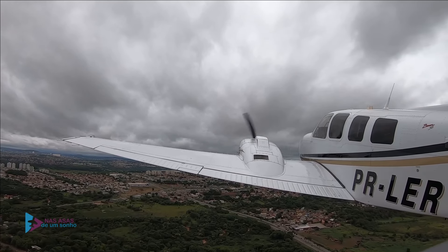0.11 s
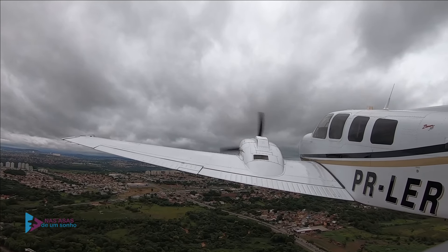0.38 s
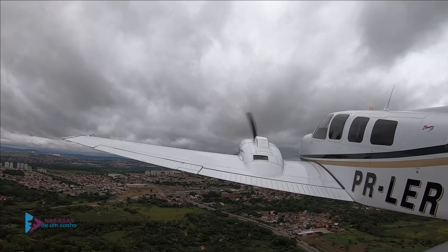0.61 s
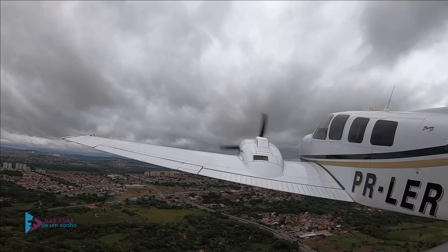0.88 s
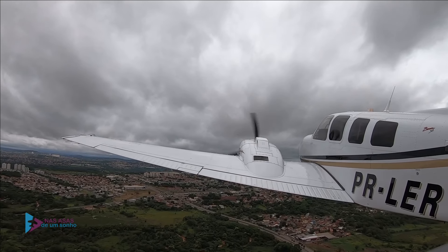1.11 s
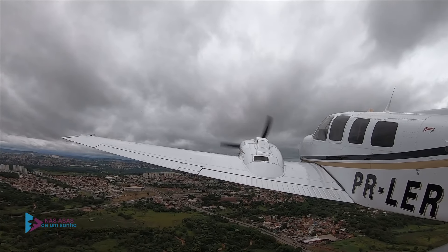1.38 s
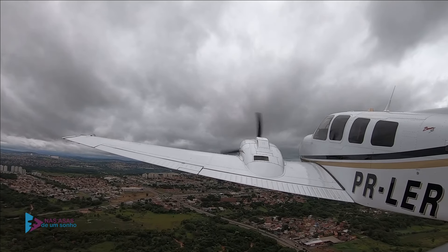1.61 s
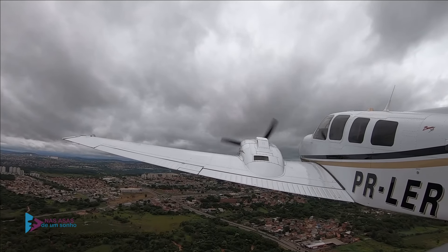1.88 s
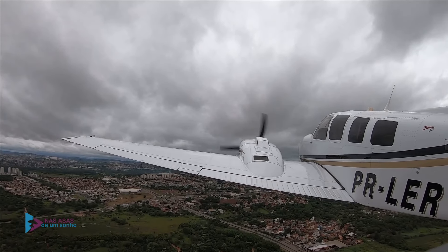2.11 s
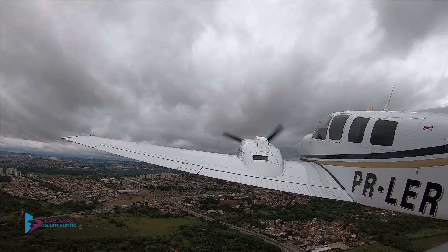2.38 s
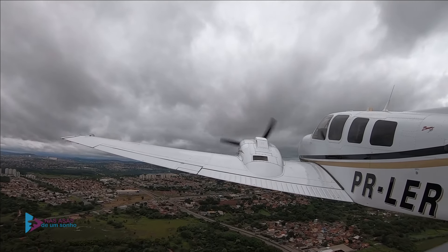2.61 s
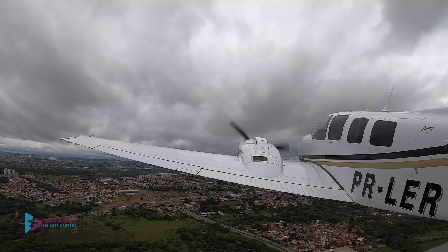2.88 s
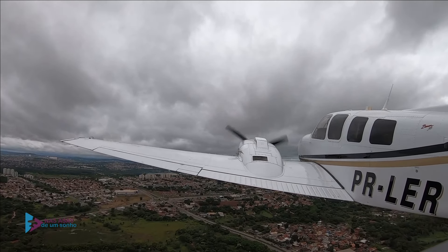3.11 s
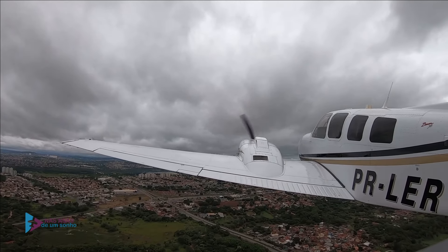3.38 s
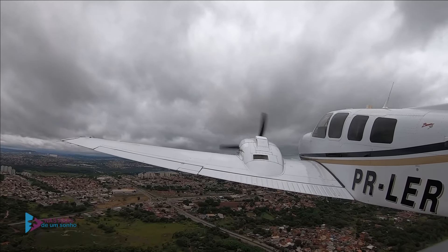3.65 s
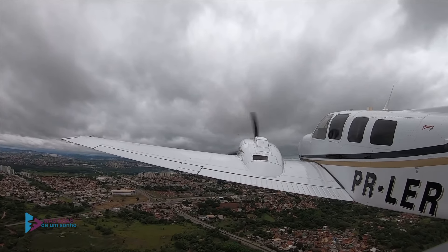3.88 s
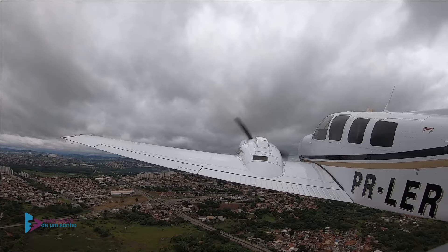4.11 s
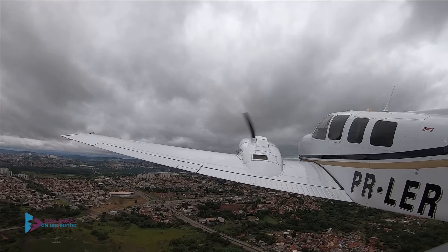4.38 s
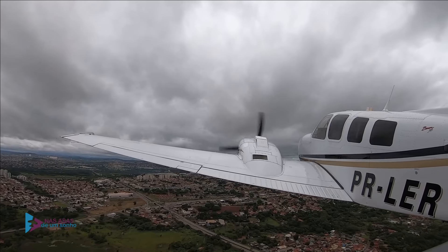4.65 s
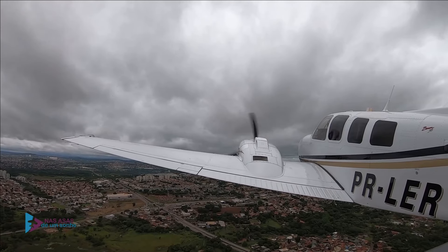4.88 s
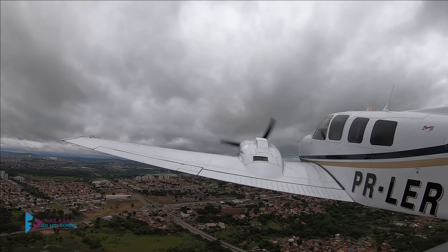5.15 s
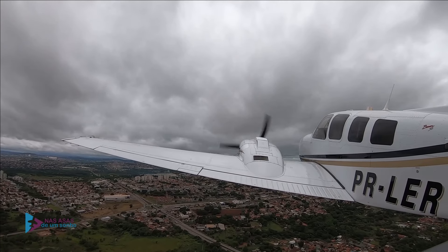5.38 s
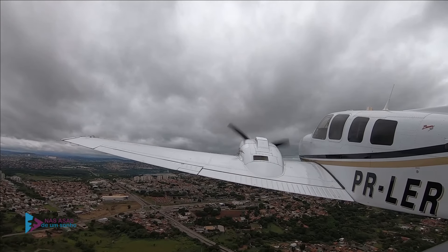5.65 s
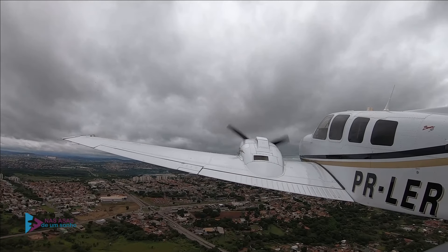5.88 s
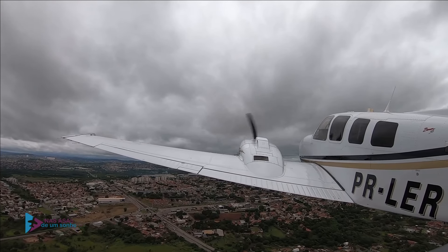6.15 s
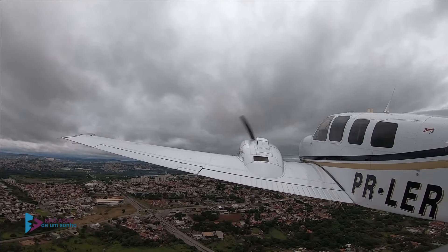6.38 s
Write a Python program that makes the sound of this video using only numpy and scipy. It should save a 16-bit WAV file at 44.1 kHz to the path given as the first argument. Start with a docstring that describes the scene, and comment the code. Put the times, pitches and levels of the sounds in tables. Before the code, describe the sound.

Two piston propeller engines of a light aircraft drone loudly and steadily, beating slowly against each other over rushing slipstream, heard in the right channel.

```python
"""Inside a light twin-engined aircraft in the climb, with one microphone wired to the right channel.
From the start two six-cylinder engines with three-blade propellers, each a stack of sine tones, run almost in step
and beat slowly over shaped-noise slipstream roar, microphone hiss and thin alternator whines. Extra treble hiss stops
after 0.15 s. The second engine slips back, holds, then partly catches up; upper tones thin out as the speed sags.
Throughout, the left channel holds only a dull leak of the right, with amplifier hiss and a faint electrical buzz."""
import sys
import numpy as np
from scipy import signal
from scipy.fft import rfft, irfft, next_fast_len
from scipy.io import wavfile
from scipy.ndimage import uniform_filter1d

SR = 44100
rng = np.random.default_rng(int(sys.argv[2]) if len(sys.argv) > 2 else 0)


def linear_from_db(decibels):
    """Turn decibels (scalar or array-like) into linear amplitude factors; 0 gives 1."""
    return 10 ** (np.asarray(decibels, float) / 20)


def generate_wav(signal):
    """Clip the signal to [-1, 1] and save it as 16-bit WAV at the path in sys.argv[1]."""
    frames = np.transpose(np.atleast_2d(signal))
    scaled = np.clip(frames, -1, 1) * 32767
    pcm = np.round(scaled).astype(np.int16)
    wavfile.write(sys.argv[1], SR, pcm)


N = 287106

# All levels below are ahead of the input gain and the limiter.
# The first engine's speed hunts slowly: (t/s, shaft speed/rpm)
FIRST_SPEED = [(0.0, 2637.7), (0.6, 2642.6), (1.2, 2655.0), (1.6, 2652), (2.1, 2650.5), (2.55, 2640.5),
               (3.3, 2650.5), (3.9, 2654.0), (4.3, 2652), (5.0, 2636.5), (5.5, 2632), (6.1, 2618),
               (6.51, 2619.0)]
# The second engine slips back, holds, then partly catches up: (t/s, lag behind the first/blade passes)
SECOND_LAG = [(0.0, 1.867), (0.65, 1.85), (1.3, 2.035), (2.0, 2.23), (2.52, 2.435), (2.75, 2.54),
              (3.65, 2.84), (4.2, 2.925), (4.55, 2.92), (5.0, 2.825), (5.65, 2.815), (6.05, 2.66),
              (6.35, 2.61), (6.51, 2.56)]
# Engine tones at multiples of half the shaft speed, 6 = firing and blade rate:
# (multiple, first engine rms level/dB, second engine rms level/dB)
ENGINE_TONES = [(1, -28, -29), (2, -28, -33), (3, -50, -25), (4, -30, -27), (5, -50, -44), (6, -12, -15),
                (7, -51, -46), (8, -43, -50), (9, -52, -46), (10, -43, -38), (11, -44, -38), (12, -19, -25),
                (13, -56, -48), (14, -44, -38), (15, -55, -40), (16, -49, -53), (17, -63, -46),
                (18, -38, -33.5), (19, -64, -45), (20, -45, -47), (21, -61, -39), (22, -45, -49),
                (23, -53, -52), (24, -45, -39.5), (25, -59, -52), (26, -45, -58), (28, -54, -48),
                (29, -55, -53), (30, -39.5, -36.5), (31, -57, -47), (32, -51, -57), (33, -56, -52),
                (35, -48, -52), (36, -40, -41), (37, -49, -59), (38, -45, -45), (41, -47, -49),
                (42, -49, -52), (44, -57, -52), (46, -54, -52), (48, -61, -49), (50, -61, -53),
                (54, -58, -58), (56, -55, -63)]
# Set delays for some second-engine tones, which time their beats; the others get chance delays:
# (multiple, delay/turns of the tone)
SECOND_DELAYS = [(1, 0.47), (2, 0.91), (4, 0.61), (6, 0.27), (12, 0.21), (18, 0.67), (24, 0.44), (30, 0.35),
                 (36, 0.62), (38, 0.24)]
# Thin whine of each alternator: (first engine peak level/dB, second engine peak level/dB)
ALTERNATOR_DB = (-63, -71.5)
# Extra treble hiss at the start: (f/Hz, level/dB per Hz)
BRIGHT_SPECTRUM = [(1500, -110), (2500, -73), (3900, -75.5), (4200, -87), (5700, -89), (6500, -110)]
# Slipstream and airframe roar in the cabin: (f/Hz, level/dB per Hz)
ROAR_SPECTRUM = [(12, -34), (35, -38), (57, -45.5), (100, -43), (160, -56), (210, -57.5), (500, -62),
                 (850, -61), (1150, -63.5), (1480, -73), (2110, -62.5), (3000, -80), (4200, -87.5),
                 (8000, -108)]
# Microphone hiss, strongest near 6.8 and 10.8 kHz: (f/Hz, level/dB per Hz)
MIC_HISS_SPECTRUM = [(4500, -115), (6000, -101), (6800, -91.5), (8300, -103), (10800, -95), (12500, -104),
                     (16000, -112)]
# Amplifier hiss, drawn afresh for each channel: (f/Hz, level/dB per Hz)
AMPLIFIER_SPECTRUM = [(12, -64), (100, -78.5), (500, -87), (2000, -94), (5200, -98), (5500, -95),
                      (5800, -99), (8000, -100.5), (10600, -103), (11200, -100), (11800, -102.5),
                      (16000, -102)]
# Electrical buzz, alike in both channels: (multiple of BUZZ_HZ, rms level/dB)
BUZZ_TONES = [(4, -64.5), (5, -69), (6, -74.5), (7, -70.5), (11, -72.5), (14, -78.5), (16, -70.5),
              (20, -79.5), (97, -75.5), (98, -73.5), (195, -73), (196, -80.5), (293, -74), (390, -83),
              (391, -76.5), (483, -93), (488, -82), (503, -89.5), (509, -88.5)]

# Unevenness of the tones at the blade rate, growing with the multiple
WANDER_DB, WANDER_TURNS, WANDER_HZ = 0.25, 0.004, 4.3
# Tones from this multiple up thin out below the knee
KNEE_RPM, THIN_FROM_MULTIPLE, THIN_DB_PER_RPM = 2634, 24, 0.14
WHINES_PER_CYCLE = 216   # alternator whine periods in two shaft turns
BRIGHT_UNTIL_S = 0.152
THROB_DB = 0.81   # peak swing of the roar
BUZZ_HZ = 30000 / 1001
# The dull leak rolls off above LEAK_HZ; a weaker one is even in tone
LEAK_DB, LEAK_HZ, EVEN_LEAK_DB = -31.5, 47, -48.5
INPUT_DB, RELEASE_DB_PER_S, LOOK_AHEAD_S = 1.73, 14, 0.006


def curve(table):
    """Reads a (time, value) table as straight lines, one value a sample."""
    return np.interp(np.arange(N) / SR, *np.transpose(table))


def drift(rate_hz):
    """Slow chance with spread 1: white noise through two equal low-pass poles."""
    pole = np.exp(-200 * np.pi * rate_hz / SR)   # drawn once every 100 samples
    slow = signal.lfilter([1], [1, -2 * pole, pole * pole], rng.standard_normal(N // 100 + 1002))
    slow = slow[1000:]   # the filter has settled
    return np.interp(np.arange(N) / 100, np.arange(len(slow)), slow / slow.std())


def coloured(spectrum, patchy_db=0.0):
    """Noise shaped to a dB-per-Hz spectrum; patchy_db is the spread of its level flicker."""
    size = next_fast_len(N)
    hz, db = np.transpose(spectrum)
    bins_hz = np.maximum(np.arange(size // 2 + 1) * SR / size, 1)
    gain = linear_from_db(np.interp(np.log(bins_hz), np.log(hz), db)) * np.sqrt(SR / 2)
    gain = gain * (bins_hz > 8)   # no rumble below 8 Hz
    noise = irfft(rfft(rng.standard_normal(size)) * gain, size)[:N]
    return noise * linear_from_db(patchy_db * drift(11.0))


def cycles():
    """Four-stroke cycles (two shaft turns) run by each engine so far."""
    first = 1 / 12 + np.cumsum(curve(FIRST_SPEED)) / (120 * SR)
    lag_passes = uniform_filter1d(curve(SECOND_LAG), size=6000)
    return first, first - lag_passes / 6   # six blade passes a cycle


def engines(first, second):
    """Each tone is the sum of both engines; it swells and fades as the second slips against the first."""
    out = np.zeros(N)
    chance = rng.random((len(ENGINE_TONES), 2))
    thin_db = THIN_DB_PER_RPM * np.minimum(curve(FIRST_SPEED) - KNEE_RPM, 0)
    delays = dict(SECOND_DELAYS)
    for (multiple, first_db, second_db), (start, chance_delay) in zip(ENGINE_TONES, chance):
        rough = multiple / 6
        if multiple % 6 == 0:
            start = 1 / 4   # the blade tones crest together: one pressure pulse a pass
        second_late = delays.get(multiple, chance_delay)
        for cycle, db, late in ((first, first_db, 0), (second, second_db, second_late)):
            turns = multiple * cycle + start - late + WANDER_TURNS * rough * drift(WANDER_HZ)
            level_db = db + WANDER_DB * rough * drift(WANDER_HZ)
            if multiple >= THIN_FROM_MULTIPLE:
                level_db = level_db + thin_db
            out += linear_from_db(level_db) * np.sqrt(2) * np.sin(2 * np.pi * turns)
    return out


def alternators(first, second):
    """A thin whine geared to each crankshaft, so its pitch follows the engine speed."""
    return sum(linear_from_db(db) * np.sin(2 * np.pi * WHINES_PER_CYCLE * cycle)
               for cycle, db in zip((first, second), ALTERNATOR_DB))


def bright_start():
    """Extra treble hiss that stops short, in a 5 ms fade."""
    fade = np.clip((BRIGHT_UNTIL_S - np.arange(N) / SR) * 200, 0, 1)
    return coloured(BRIGHT_SPECTRUM) * fade


def roar(first):
    """Slipstream noise, kicked by each blade pass of the first engine."""
    throb = linear_from_db(THROB_DB * np.sin(2 * np.pi * 6 * first))
    return throb * coloured(ROAR_SPECTRUM, patchy_db=0.03)


def mic_hiss():
    """Microphone hiss: treble noise with bumps in its spectrum and a slight flicker."""
    return coloured(MIC_HISS_SPECTRUM, patchy_db=0.2)


def scene():
    """The microphone hears the cabin and adds its hiss; only the right channel is wired to it."""
    first, second = cycles()
    cabin = engines(first, second) + alternators(first, second) + bright_start() + roar(first)
    microphone = cabin + mic_hiss()
    return np.array([np.zeros(N), microphone])


def leak(microphone):
    """Crosstalk into the idle channel: mostly a one-pole low-pass, plus a weaker even share."""
    pole = np.exp(-2 * np.pi * LEAK_HZ / SR)
    dull = signal.lfilter([1 - pole], [1, -pole], microphone)
    return linear_from_db(LEAK_DB) * dull + linear_from_db(EVEN_LEAK_DB) * microphone


def amplifier_hiss():
    """Steady noise of the amplifier, independent in the two channels."""
    return np.array([coloured(AMPLIFIER_SPECTRUM), coloured(AMPLIFIER_SPECTRUM)])


def buzz():
    """Steady electrical harmonics of one low rate, each starting at a chance phase."""
    now = np.arange(N) / SR
    starts = rng.random(len(BUZZ_TONES))
    return sum(linear_from_db(db) * np.sqrt(2) * np.sin(2 * np.pi * (multiple * BUZZ_HZ * now + start))
               for (multiple, db), start in zip(BUZZ_TONES, starts))


def limiter(wired):
    """Both channels are turned down together just before a peak and recover slowly."""
    over_db = np.maximum(20 * np.log10(np.abs(wired).max(axis=0) + 1e-9), 0)
    ramp = RELEASE_DB_PER_S * np.arange(N) / SR
    held = np.maximum.accumulate(over_db + ramp) - ramp   # falls at the release rate
    ahead = int(LOOK_AHEAD_S * SR)
    early = np.r_[held[ahead:], np.full(ahead, held[-1])]
    return wired * linear_from_db(-uniform_filter1d(np.maximum(held, early), size=ahead))


def roll_off(x):
    """The treble ends steeply here."""
    return signal.sosfilt(signal.butter(12, 15330, fs=SR, output="sos"), x)


def record(dry):
    """Leak into the idle channel, hiss and buzz, then input gain and the limiter."""
    microphone = dry[1]
    wired = np.array([leak(microphone), microphone]) + amplifier_hiss() + buzz()
    mix = np.clip(limiter(linear_from_db(INPUT_DB) * wired), -1, 1)
    return roll_off(mix)


dry = scene()
out = record(dry)
generate_wav(out)
```